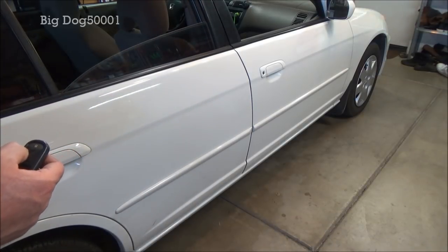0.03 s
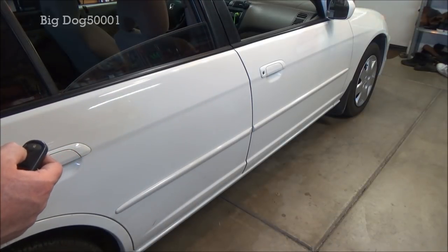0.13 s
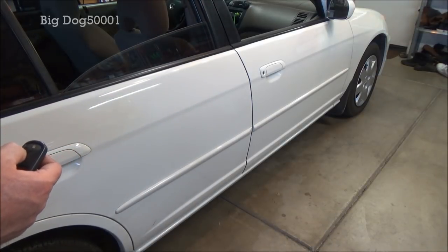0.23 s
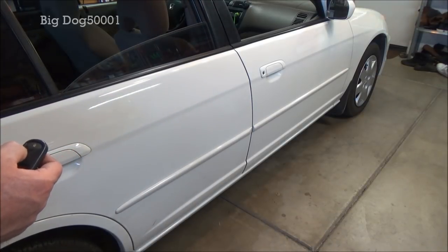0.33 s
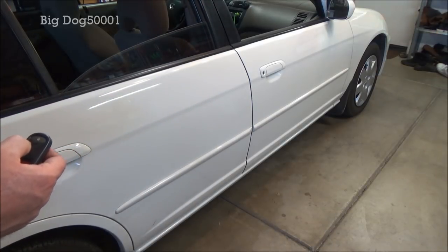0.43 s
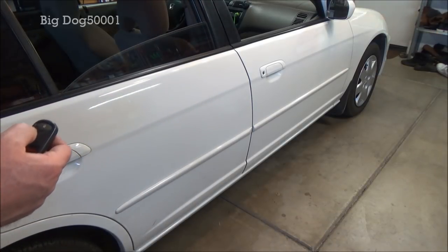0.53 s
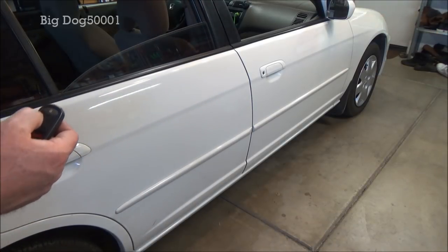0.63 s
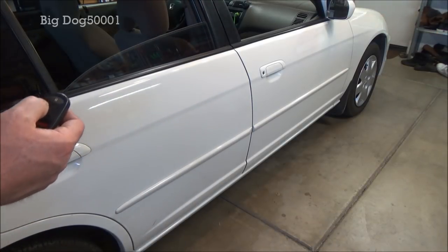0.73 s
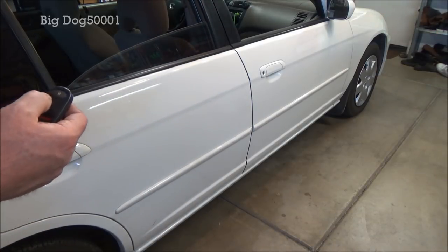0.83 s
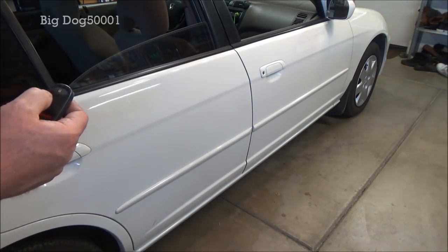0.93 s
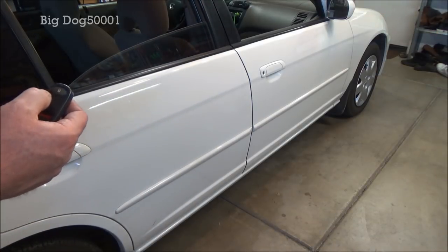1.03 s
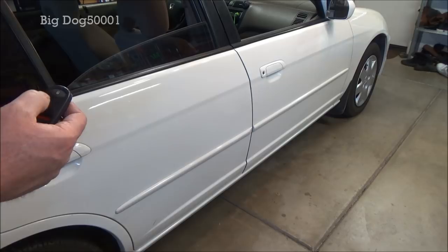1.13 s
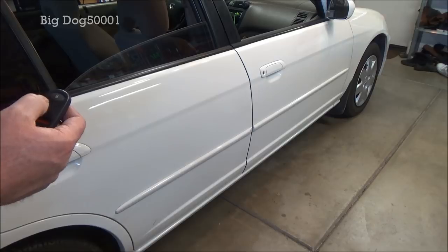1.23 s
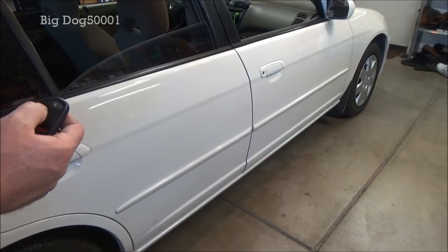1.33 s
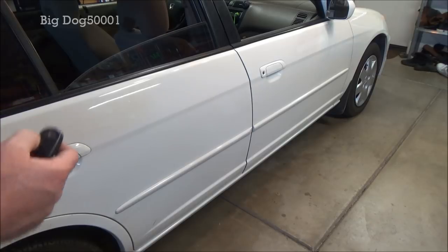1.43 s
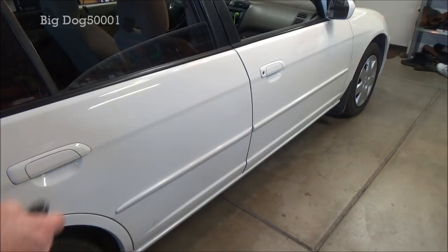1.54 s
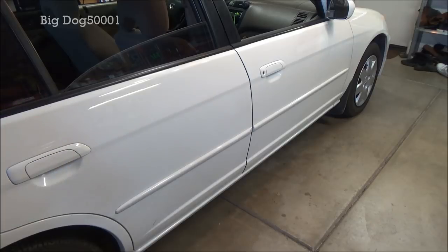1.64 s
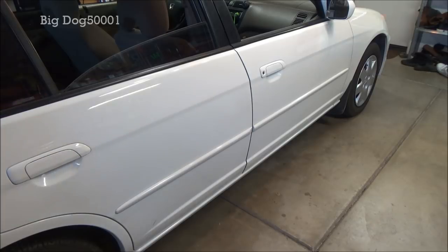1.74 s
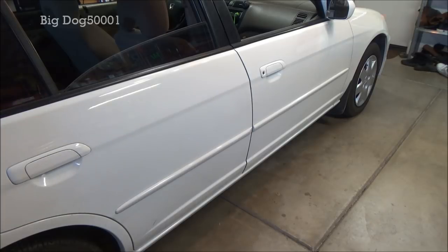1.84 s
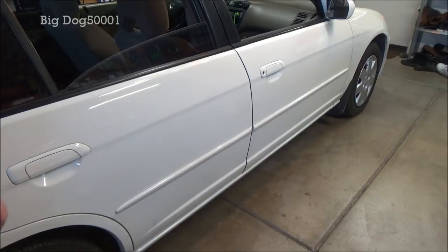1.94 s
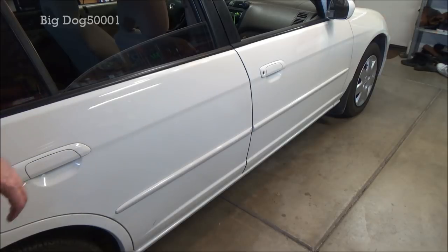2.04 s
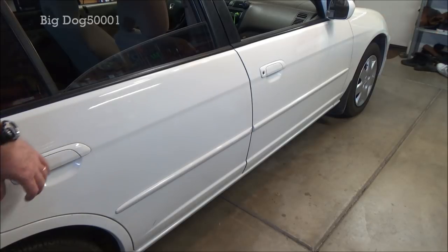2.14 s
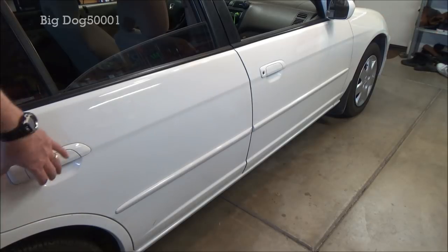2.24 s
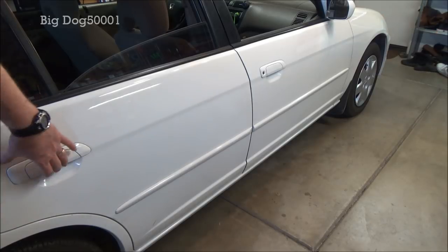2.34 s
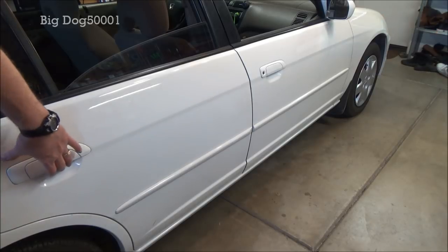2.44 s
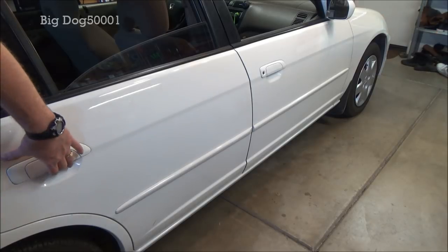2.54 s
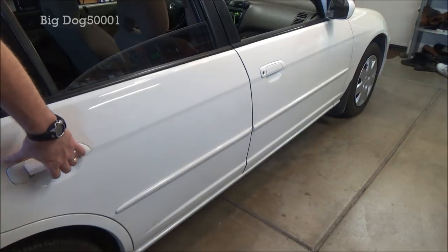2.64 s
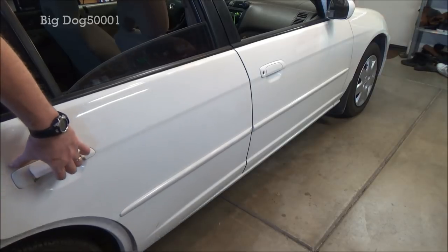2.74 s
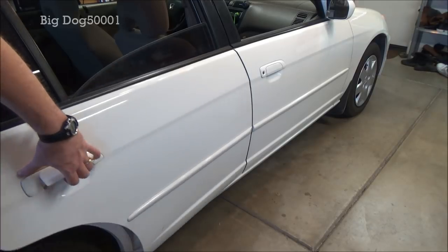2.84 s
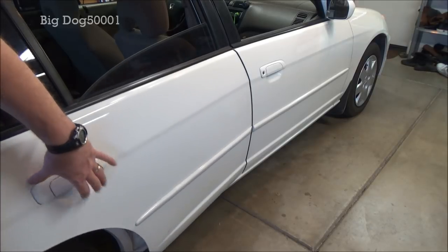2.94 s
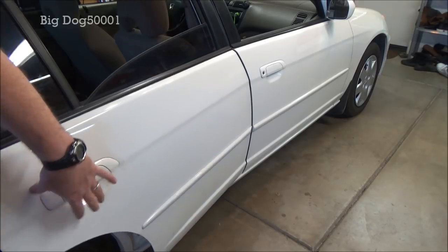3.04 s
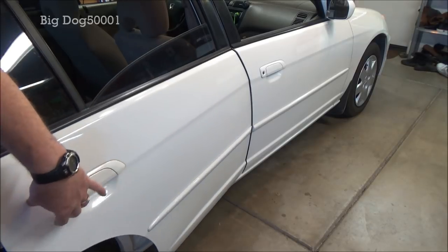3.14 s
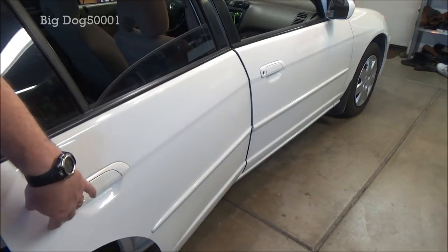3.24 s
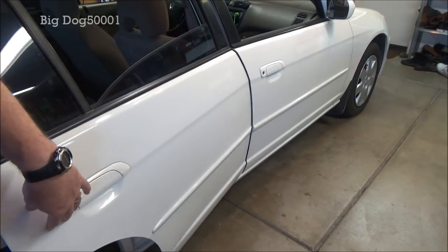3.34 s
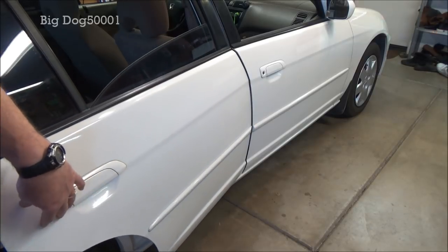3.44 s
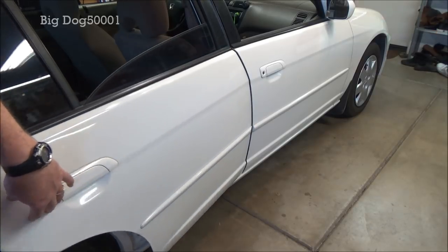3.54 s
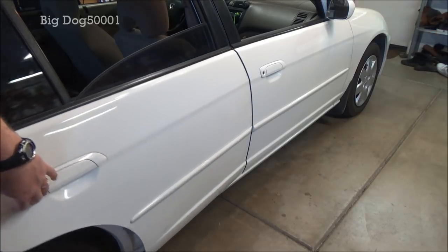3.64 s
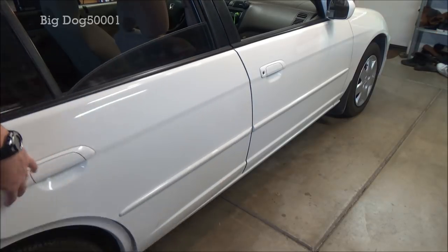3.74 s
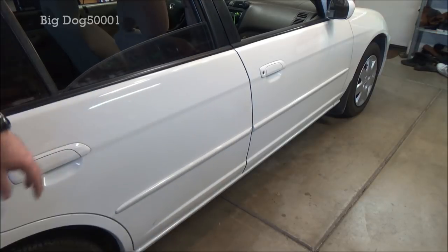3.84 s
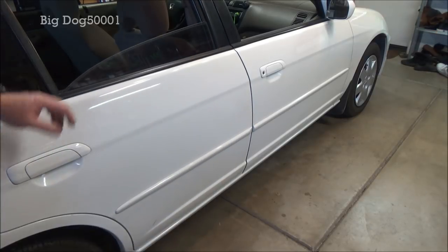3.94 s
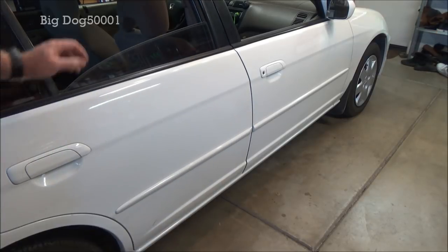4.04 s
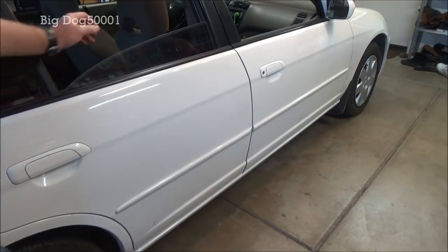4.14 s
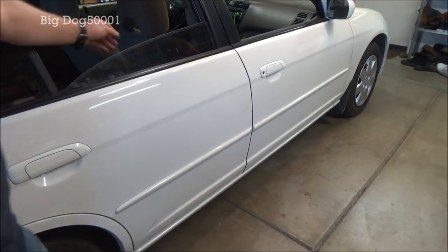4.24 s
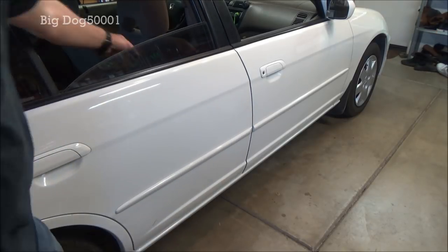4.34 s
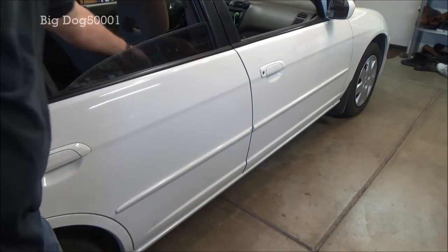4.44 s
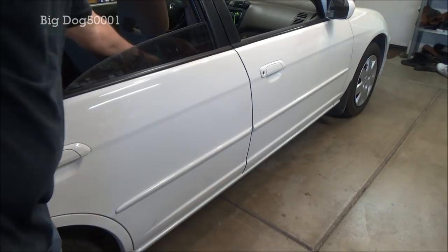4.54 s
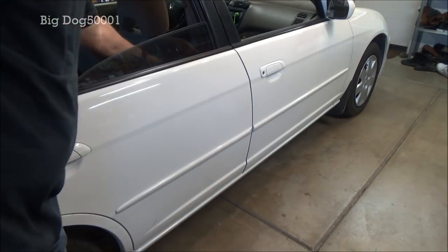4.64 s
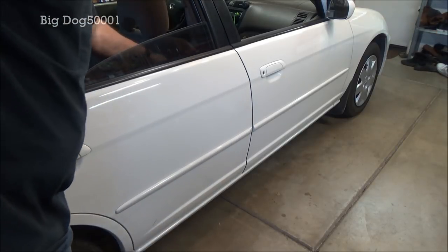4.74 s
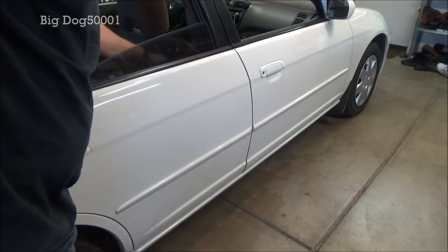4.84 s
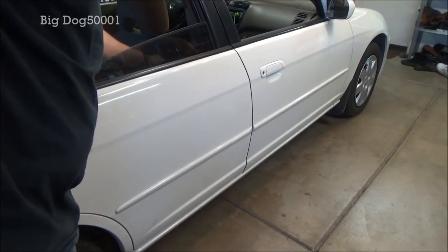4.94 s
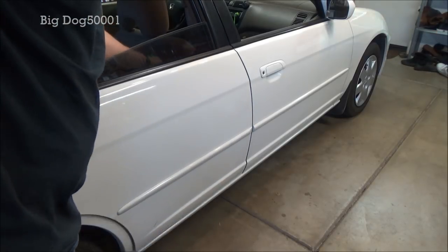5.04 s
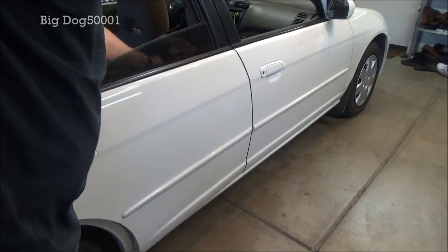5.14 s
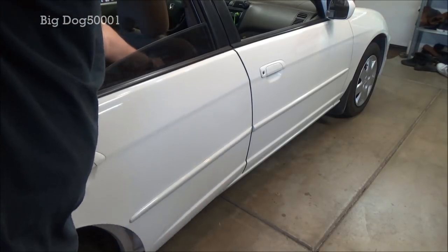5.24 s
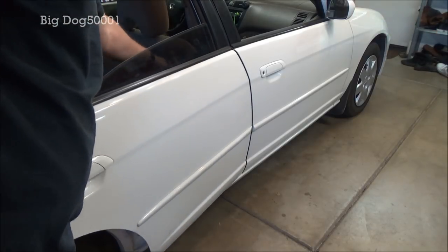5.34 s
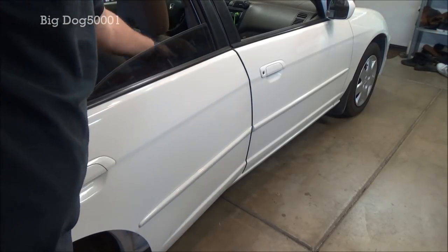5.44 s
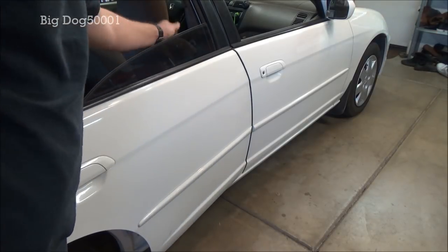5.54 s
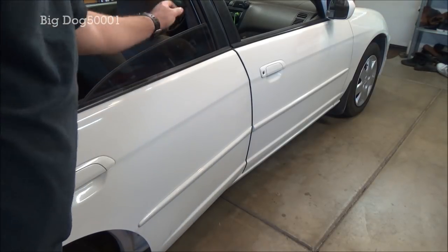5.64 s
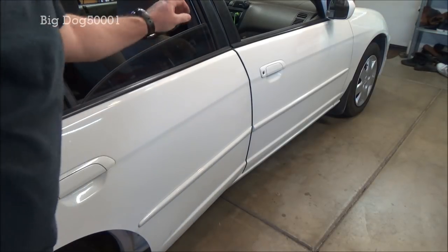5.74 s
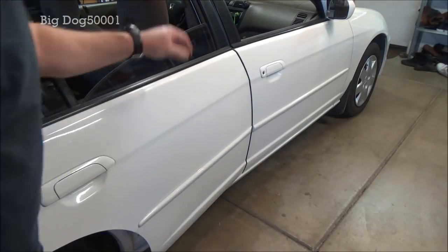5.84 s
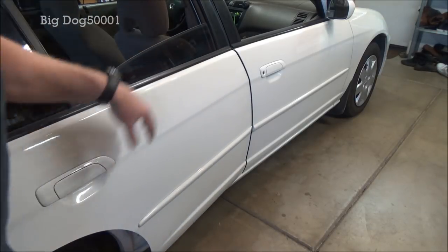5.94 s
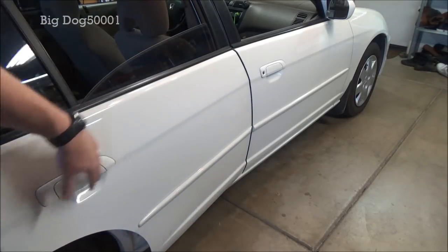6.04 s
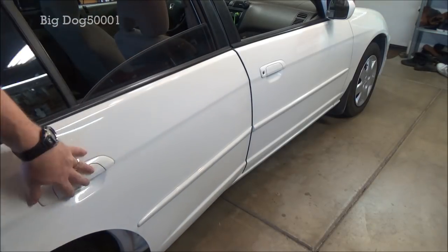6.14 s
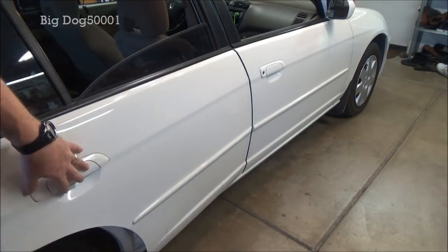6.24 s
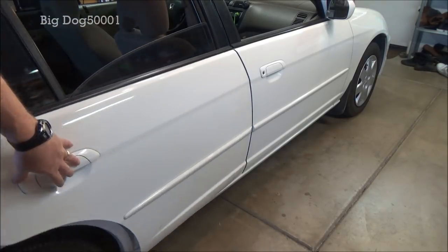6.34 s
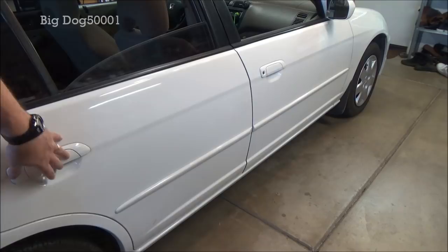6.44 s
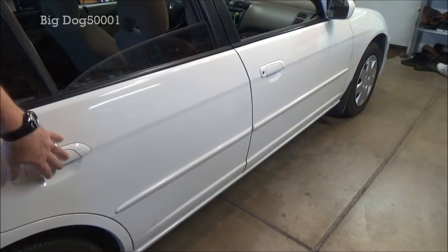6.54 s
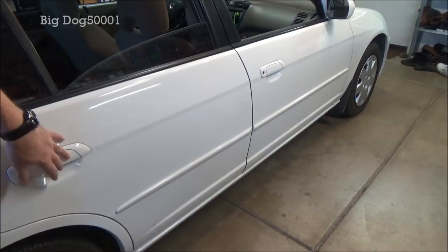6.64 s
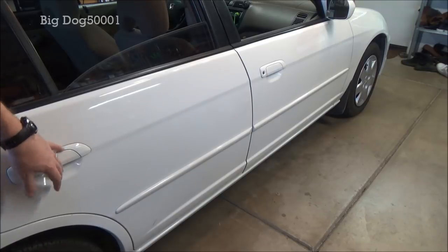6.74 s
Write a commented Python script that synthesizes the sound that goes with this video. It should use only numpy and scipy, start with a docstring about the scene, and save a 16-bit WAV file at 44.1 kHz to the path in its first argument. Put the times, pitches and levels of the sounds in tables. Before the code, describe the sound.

A quiet garage with low hiss, a swelling low murmur and very faint insect chirring at the start and around 3 s. Tiny key fob clicks snap at 0.5 and 0.8 s, with a barely audible one near 1.0. At 1.15-1.3 s the door lock clunks over in a quick, dull double knock. Soft shoe and cloth movements follow around 1.8-2.4 s. The handle clatters at 2.6-2.7 s, creaks slightly, then the latch releases at 2.94 s with a very loud hollow metallic clack. At 3.8 s the door shuts: deep thump, latch crack, small rebounds. Cloth brushes at 4.2-4.5 s; muffled knocks come from 4.5 to 5.1 s, then a clunk at 5.4 s and a bright snap at 5.5. Brushing and soft door movement rise from 5.7 to 6.35 s, before a second, slightly stronger shutting thud at 6.45 s rings out briefly.

```python
"""Key fob and car door in a garage

A hand presses a key fob, the door locks of a car clunk over, a handle is pulled and let go, the door is opened
and pushed shut twice. Blows are knocks plus dying rattles in seven registers, and they ring a resonant door shell.
Shoes shift and the door sweeps in as soft blows, a shoe squeaks as gliding tones, cloth brushes as grainy noise,
something small ticks through metal modes, a cricket chirps as gated narrow noise over soft hum and hiss.
A noise tail gives the garage."""
import sys
import numpy as np
from scipy import signal
from scipy.io import wavfile

SR = 44100
rng = np.random.default_rng(int(sys.argv[2]) if len(sys.argv) > 2 else 0)


def transcribe(signal):
    """Save signal, clipped to [-1, 1], as a 16-bit WAV file at the path in sys.argv[1]."""
    frames = np.atleast_2d(signal).T
    limited = np.clip(frames, -1, 1)
    pcm = np.round(limited * 32767).astype(np.int16)
    wavfile.write(sys.argv[1], SR, pcm)


N = 299880   # length in samples

# pushes that shut the door: (t/s, strength/dB)
SHUT_PUSHES = [(3.78, -2.8), (6.432, -2)]


def amp(db):
    """dB to gain."""
    return 10 ** (np.asarray(db, float) / 20)


def rms_one(x):
    """Scale to rms 1."""
    return x / np.sqrt(np.mean(x ** 2) + 1e-20)


def at_hz(points, hz):
    """Read a table on a log-frequency axis."""
    table_hz, values = np.array(points).T
    return np.interp(np.log(hz), np.log(table_hz), values)


def band(x, low_hz, high_hz, order=2):
    """Butterworth band-pass."""
    edges_hz = [low_hz, min(high_hz, SR / 2.2)]
    return signal.sosfilt(signal.butter(order, edges_hz, "band", fs=SR, output="sos"), x)


def sides(pan_db):
    """Left and right gains for a left-minus-right level."""
    return amp(np.array([[pan_db / 2], [-pan_db / 2]]))


def stereo(mid, side, alike):
    """Blend a common and an opposed noise so that left and right are as alike as asked."""
    return np.sqrt(1 + alike) * mid + np.sqrt(1 - alike) * side * [[1], [-1]]


def ring(x, hz, t60):
    """Damped oscillator: a unit click sets off a dying sine that starts at height 1."""
    r, w = amp(-60 / (t60 * SR)), 2 * np.pi * hz / SR
    return signal.lfilter([0, np.sin(w)], [1, -2 * r * np.cos(w), r * r], x + 1e-15)


def resonance(x, hz, width_hz):
    """Two-pole resonance with a gain of about 1 at its peak."""
    r = np.exp(-np.pi * width_hz / SR)
    zeros = np.array([1, 0, -1]) * (1 - r * r) / 2
    return signal.lfilter(zeros, [1, -2 * r * np.cos(2 * np.pi * hz / SR), r * r], x)


def clicks(rows):
    """Single sharp contacts, one sample each, from rows of (t/s, level/dB, left-right/dB)."""
    train = np.zeros((2, N))
    for s, level_db, pan_db in rows:
        train[:, round(s * SR)] = amp(level_db) * sides(pan_db)[:, 0]
    return train


def scratch(rows, t60):
    """Each contact drags on as a short dying noise."""
    envelope = signal.lfilter([1], [1, -amp(-60 / (t60 * SR))], clicks(rows) + 1e-15)
    return envelope * rng.standard_normal(N)


def hump(hz, level_db, centre_hz, slopes_db):
    """Power of a broad peak that falls off to both sides."""
    octaves = np.log2(hz / centre_hz)
    return amp(level_db - max(-slopes_db[0] * octaves, slopes_db[1] * octaves)) ** 2


def rattle(rows, rough_db, knock_db):
    """Each event is a knock and a dying run of uneven contacts, weighted by how hard it drives each register."""
    # latch, thump, boom, panel, clack, crack, snap: (low/Hz, high/Hz, lean to the left/dB,
    # share that differs between the sides, first knock/dB before knock_db, speed of rise, speed of decay)
    registers = [(544, 995, -2, 0.25, -3, 0.71, 0.94), (47.7, 85, -2.5, 0.049, -2, 0.38, 0.62),
                 (108.8, 198.7, -2.5, 0.018, 0, 1.56, 1.3), (210.4, 499, -2, 0.11, -2, 0.69, 0.83),
                 (1083, 2105, -2, 0.32, -17, 1.02, 1.076), (1950, 5360, -3, 0.2, 3, 1, 1.25),
                 (4500, 9680, -1.7, 0.05, 8, 3.2, 0.75)]
    thud_slopes_db, crack_slopes_db = (15, 11), (8, 8)   # loss below and above the centre, dB per octave
    uneven = amp(rough_db * np.minimum(rng.exponential(1, N), 4))
    clumps = rms_one(band(rng.standard_normal(N), 30.3, 280))   # contacts come in clusters a few ms apart
    # two sets of contacts, taken in turn down the list of registers
    contacts = rms_one(rng.standard_normal((2, 2, N)) * uneven * amp(1.24 * clumps))
    out = np.zeros((2, N))
    for k, (low_hz, high_hz, lean_db, apart, first_db, quick, brief) in enumerate(registers):
        hz = np.sqrt(low_hz * high_hz)
        force, knocks = np.full((2, N), 1e-9), np.zeros((2, N))
        for s, thud_db, thud_hz, crack_db, crack_hz, pan_db, t60_ms, rise_ms in rows:
            thud = hump(hz, thud_db, thud_hz, thud_slopes_db)
            crack = hump(hz, crack_db, crack_hz, crack_slopes_db)
            level_db = 10 * np.log10(thud + crack)
            at = round(s * SR)
            ms = np.arange(min(N - at, SR // 2)) * 1000 / SR
            decay = amp(level_db - 60 * brief * ms / max(t60_ms, 4))
            rise = 1 - np.exp(-quick * ms / max(rise_ms, .1))
            gains = sides(pan_db + lean_db)
            force[:, at:at + len(ms)] += gains * decay * rise
            # a slow rise softens the first knock
            knocks[:, at] = gains[:, 0] * amp(level_db + first_db + knock_db) / np.sqrt(max(rise_ms, .1))
        mid, side = contacts[k % 2]
        share = np.sqrt(SR / 2 / (high_hz - low_hz))   # keeps the band at the force's level
        drive = force * (mid + apart * side * [[1], [-1]]) + share * knocks
        out += share * band(drive, low_hz, high_hz, order=3)
    return out


def background():
    """Half-octave bands of stereo hiss with a swelling low murmur, plus hum lines of very narrow noise."""
    # hiss spectrum before overall scaling: (f/Hz, relative level/dB)
    hiss_spectrum = [(15, -37), (25, -21), (64, -2), (212, 3), (503, -4), (641, 0), (714, -3), (775, -3),
                     (988, -5), (1890, -8), (7510, -16.5), (9840, -17), (14800, -21.5), (16000, -33)]
    # hum lines: (f/Hz, rms level/dB)
    hum_lines = [(59.2, -79.5), (479.1, -86), (721.4, -79), (839.8, -82), (1007, -82)]
    # left-right likeness of the hiss: (f/Hz, likeness 0 to 1)
    likeness = [(60, 1), (240, 0.88), (950, 0.17), (3770, 0.28), (15000, 1)]
    # the low room murmur swells and sinks, less so towards the treble: (t/s, relative level/dB)
    murmur = [(0, -1.5), (1, -4.5), (2.2, -3), (3.5, 2.5), (4.5, 1), (5.3, 10.5), (5.9, 2.5), (6.8, 15.5)]
    hiss_db = -62.5   # rms
    hiss, edges = 0, 22 * 2 ** np.arange(0, 10, .5)
    white = rng.standard_normal((2, 2, N))
    swell_db = np.interp(np.arange(N) / SR, *np.transpose(murmur))
    for k, (low, high) in enumerate(zip(edges, edges[1:])):
        mid, side = band(white[k % 2], low, high)
        hz = np.sqrt(low * high)
        level_db = at_hz(hiss_spectrum, hz) + swell_db / (1 + hz / 3000)
        hiss = hiss + amp(level_db) * stereo(mid, side, at_hz(likeness, hz))
    hum = sum(amp(level_db) * rms_one(resonance(white[1, 0], hz, 16.0)) for hz, level_db in hum_lines)
    return amp(hiss_db) * rms_one(hiss) + hum


def cricket():
    """Short bursts of a narrow band at a steady rate, in bouts that fade in and out."""
    # bouts of faint chirring: (start t/s, end t/s, level/dB)
    chirring = [(0, .5, -82), (2.9, 3.8, -78.5)]
    song_hz, chirps_per_s, first_chirp_s, fade_db_per_s = 3460, 29.9, 0.0346, 90
    t = np.arange(N) / SR
    gate = np.maximum(np.cos(2 * np.pi * chirps_per_s * (t - first_chirp_s)), 0) ** 4
    bouts = 0
    for start, end, level_db in chirring:
        outside_s = np.maximum(np.maximum(start - t, t - end), 0)
        bouts = bouts + amp(level_db - fade_db_per_s * outside_s)
    return bouts * rms_one(resonance(gate * rng.standard_normal(N), song_hz, 260))


def soft_blows():
    """Footfalls, leanings and the door sweeping in before it shuts: soft blows with one place and one decay."""
    # (t/s, thud level/dB, thud f/Hz, crack level/dB, crack f/Hz, rise/ms before each register's speed)
    soft_events = [(0.018, -59.5, 60, -70, 2000, 15), (0.261, -57.5, 196, -67, 650, 5.8),
                   (0.565, -50.5, 206, -58, 700, 20), (1.782, -58, 280, -54.5, 950, 3.2),
                   (1.832, -59, 151, -61.5, 3000, 16), (2.083, -53, 237, -61, 754, 3.7),
                   (2.322, -47.5, 91, -64.5, 1370, 5.2), (2.368, -52, 128, -79, 706, 30),
                   (3.703, -49.5, 300, -49, 3000, 36), (4.244, -44, 89, -52, 900, 10),
                   (6.076, -35, 165, -49, 2650, 14.5), (6.152, -48, 130, -54, 1480, 10),
                   (6.346, -33, 380, -48.5, 3240, 36)]
    pan_db, t60_ms = 2.7, 257   # decay before each register's speed
    rows = [(*row, pan_db, t60_ms, rise_ms) for *row, rise_ms in soft_events]
    return rattle(rows, rough_db=-1.5, knock_db=7.0)


def ticks():
    """A slow regular tick: a short scratch through small damped metal modes."""
    # contacts: (t/s, level/dB, left-right/dB)
    tick_hits = [(0.393, -52, 4), (1.936, -52, 2.5), (3.4421, -50, 1.5), (4.996, -48, 2)]
    # metal modes: (f/Hz, width/Hz, level/dB)
    metal_modes = [(500, 62, 16.5), (5200, 540, 6), (6700, 640, -15), (9100, 500, -9), (9600, 500, 7),
                   (11800, 530, -26)]
    rub = scratch(tick_hits, t60=0.086)
    metal = sum(amp(level_db) * resonance(rub, hz, width) for hz, width, level_db in metal_modes)
    return metal + amp(-2.5) * band(rub, 1000, 8100)


def fob():
    """The button dome snaps inside a small plastic shell, heard as a band-passed click and three short rings."""
    # button snaps: (t/s, level/dB, left-right/dB, shell f/Hz, body level/dB, top level/dB)
    presses = [(0.5237, -46.5, -1, 3680, -23, -12), (0.827, -41.5, 3.0, 2880, -32, -6),
               (0.9727, -63.5, -7, 2870, 11, -24)]
    t60_s, body_hz, top_hz = 0.0042, 1700, 9500
    out = 0
    for s, level_db, pan_db, shell_hz, body_db, top_db in presses:
        snap = clicks([(s, level_db, pan_db)])
        out = out + ring(snap, shell_hz, t60_s) + amp(8.0) * band(snap, 920, 12000)
        out = out + amp(body_db) * ring(snap, body_hz, t60_s)
        out = out + amp(top_db) * ring(snap, top_hz, t60_s)
    return out


def all_blows():
    """Single blows and the two shuttings; the brighter the crack, the more sudden the blow."""
    # blows on lock, handle and door, each a thud and a crack: (t/s, thud level/dB, thud f/Hz,
    # crack level/dB, crack f/Hz, left-right/dB, rattle t60/ms before each register's speed)
    single_blows = [(1.144, -67, 250, -53.5, 6500, 4, 174), (1.187, -38.5, 394, -35.5, 960, 3, 445),
                    (1.216, -42, 260, -50, 1510, -1, 130), (1.255, -28.5, 304, -25.5, 1840, 2.5, 95),
                    (1.3, -31.5, 260, -40, 1100, 2.5, 120), (2.566, -50, 328, -31.5, 2040, 6.5, 69),
                    (2.587, -32.5, 202, -30, 2040, 2, 170), (2.652, -25.5, 130, -34.5, 2000, 3.5, 80),
                    (2.667, -25, 410, -33.5, 1720, 5.5, 140), (2.698, -39, 250, -38.5, 920, 1.5, 320),
                    (2.89, -39.5, 165, -39.5, 795, 2, 210), (2.939, -5, 251, -11, 1730, 6, 115),
                    (2.981, -5, 366, -12, 1100, -2.5, 49), (3.031, -47, 121, -34, 1010, -1, 200),
                    (4.468, -39.5, 180, -53, 1680, 2.5, 230), (4.609, -45.5, 176, -53.5, 1730, 2.5, 190),
                    (4.661, -56, 200, -42.5, 715, 2, 52), (4.872, -53, 248, -49, 1030, 2, 130),
                    (4.911, -46, 197, -45, 1140, 2, 310), (4.98, -25, 189, -37.5, 690, 3.5, 283),
                    (5.045, -41, 300, -36.5, 725, 4, 135), (5.098, -54, 300, -49, 1200, -2, 54),
                    (5.323, -53, 194, -40.5, 826, 2.5, 670), (5.384, -23.5, 388, -21, 1220, 2.5, 101),
                    (5.449, -36.5, 230, -51, 1100, 1, 320), (5.525, -32.5, 332, -13.5, 5530, 3.5, 116),
                    (5.599, -38.5, 194, -31.5, 1790, 2, 91)]
    # every shutting runs the same way, seal, latch, then rebounds: (delay/s, thud level/dB re strength,
    # thud f/Hz, crack level/dB re strength, crack f/Hz, left-right/dB, rattle t60/ms as above)
    shut_sequence = [(0, -12, 192, -18.5, 733, 6, 303), (.017, -23, 79, -10.5, 1790, 3.4, 163),
                     (0.052, -16, 167, -15, 1130, 1, 92), (.079, -21, 230, -20, 1100, 2, 165),
                     (0.128, -19, 215, -30, 1300, 2, 113)]
    rise_at_1_khz_ms, rise_power, fastest_rise_ms = 4.13, 0.84, 2.2   # before each register's speed
    blows = list(single_blows)
    for s, shut_db in SHUT_PUSHES:
        for late, thud_db, thud_hz, crack_db, *rest in shut_sequence:
            blows.append((s + late, thud_db + shut_db, thud_hz, crack_db + shut_db, *rest))
    rows = []
    for row in blows:
        crack_hz = row[4]
        rise_ms = max(rise_at_1_khz_ms * (1000 / crack_hz) ** rise_power, fastest_rise_ms)
        rows.append((*row, rise_ms))
    return rows


def door():
    """Blows, bounces and handle slips ring the door shell; shutting it also pumps the cabin air."""
    # the door skin bounces on its rubber seal: (t/s, level/dB)
    seal_bounces = [(3.825, -15), (3.839, -14), (3.856, -36), (6.487, -12), (6.51, -20), (6.521, -20),
                    (6.559, -20), (6.572, -28)]
    # the handle pivot creaks in small slips: (t/s, level/dB)
    handle_slips = [(2.861, -41.5), (2.875, -50), (2.889, -41), (2.912, -44), (2.928, -33.5)]
    # door shell resonances: (f/Hz, width/Hz, level/dB)
    shell_modes = [(56.5, 15, 1), (155.3, 10.8, 4), (237.2, 27, -2.5), (350, 17, -22), (500, 17, -8.5),
                   (679, 14.4, 5.5), (919, 4.2, -8), (1158, 14, 2.5), (1242, 78, -11), (1860, 160, -11),
                   (3010, 300, -1), (5340, 34, 3), (10500, 1100, -7.5)]
    low_hz, high_hz = 114, 430   # band of the bounces
    cabin_hz, cabin_t60_s, cabin_db = 22.4, 1, -31
    bounces = band(clicks([(*row, 14) for row in seal_bounces]), low_hz, high_hz)
    bounces *= SR / (2 * (high_hz - low_hz))   # makes up for what the narrow band takes from a click
    creak = band(scratch([(*row, 3.5) for row in handle_slips], t60=0.066), 600, 6900)
    blows = rattle(all_blows(), rough_db=3.5, knock_db=4.0) + creak + bounces
    shell = 0
    for k, (hz, width, level_db) in enumerate(shell_modes):
        shell = shell + (-1) ** k * amp(level_db) * resonance(blows, hz, width)   # signs alternate
    push = np.zeros(N)
    push[[round(s * SR) for s, _ in SHUT_PUSHES]] = amp(cabin_db)   # both pushes pump equally
    soft_push = signal.lfilter([.004], [1, -.996], push)
    cabin = ring(soft_push, cabin_hz, cabin_t60_s)
    return amp(-2.0) * blows + amp(3.0) * band(blows, 12400, 19200) + shell + cabin * sides(2.4)


def brush():
    """Cloth and skin brush past: grainy friction noise, brighter or darker by the stroke, over a duller drag."""
    # strokes: (peak t/s, level/dB, brightness f/Hz, drag level/dB, rise over 20 dB/s, fall over 20 dB/s)
    strokes = [(1.5, -81, 3600, -76, 0.033, 0.081), (1.846, -66, 5100, -72, 0.049, 0.12),
               (1.94, -71, 5100, -67.5, 0.049, 0.56), (2.174, -79, 4260, -90, 0.37, 0.89),
               (4.21, -58, 4360, -61.5, 0.37, 0.4), (4.468, -61, 4100, -69, 0.042, 0.33),
               (4.8, -74, 3900, -76, .5, 0.085), (5.718, -51, 4050, -59.5, 0.16, 0.33),
               (6.028, -44, 3770, -59, 0.045, 0.065), (6.262, -39, 4580, -60, 0.087, 0.084)]
    t, out = np.arange(N) / SR, np.zeros(N)
    noise = rng.standard_normal((2, N)) * amp(2.35 * np.minimum(rng.exponential(1, N), 4))
    low = rms_one(band(noise[0], 2230, 5740))
    bright = rms_one(band(noise[1], 3700, 10700, order=3))
    drag = rms_one(band(noise[1], 257, 1600))
    for s, level_db, hz, drag_db, rise_s, fall_s in strokes:
        mix = np.clip(np.log2(hz / 2600) / 1.43, 0, 1)   # 0 is all low, 1 is all bright
        stroke = amp(-20 * np.maximum((s - t) / rise_s, (t - s) / fall_s))
        friction = (1 - mix) * low + mix * bright
        out += stroke * (amp(level_db) * friction + amp(drag_db) * drag)
    return out * sides(2.3)


def squeaks():
    """A shoe squeaks: a thin tone whose pitch and level arch up and down."""
    # (start t/s, length/s, top f/Hz, fall at the ends/Hz, peak level/dB)
    shoe_squeaks = [(2.15, .12, 9900, 600, -78), (4.79, 0.047, 9600, 376, -72)]
    out = np.zeros(N)
    for s, length, top_hz, fall_hz, level_db in shoe_squeaks:
        u = np.linspace(-1, 1, round(length * SR))
        tone = np.sin(2 * np.pi * np.cumsum(top_hz - fall_hz * u ** 2) / SR)
        at = round(s * SR)
        out[at:at + len(u)] = amp(level_db) * np.sqrt(1 - u ** 2) * tone
    return out


def garage(x):
    """A dense tail of reflections that dies band by band, partly its own on each side."""
    # reverberation bands: (f/Hz, t60/s, level/dB, left-right likeness 0 to 1)
    tail_bands = [(48, .7, -7, 1), (124.5, 0.5, -6.5, 1), (313, 0.4, -6, 1), (744, 0.45, -8, 0.7),
                  (1710, 0.48, -9.5, 0.62), (3160, 0.41, -7, 0.73), (6000, 0.32, -11.5, 0.41),
                  (12800, 0.87, -20.5, 1)]
    t = np.arange(SR) / SR
    white, tail = rng.standard_normal((2, 2, SR)), 0
    for k, (hz, t60, level_db, alike) in enumerate(tail_bands):
        mid, side = band(white[k % 2], hz / 1.28, hz * 1.78) * amp(-60 * t / t60)
        # a longer tail is scaled down to hold its energy
        tail = tail + amp(level_db) * stereo(mid, side, alike) / np.sqrt(t60 * SR / 14)
    tail = tail * np.clip((t - .003) / 0.015, 0, 1)   # the first walls answer after a few ms
    return signal.fftconvolve(x, tail, axes=1)[:, :N]


def scene():
    """Near sources with the garage around them, over the background; fob and tick send a touch less to it."""
    near = soft_blows() + door() + brush()
    hand = ticks() + fob()
    return near + hand + garage(near + amp(-0.5) * hand) + cricket() + squeaks() + background()


def record(dry):
    """A compressor turns loud blows down and lets go again, peaks that slip past are rounded, the top is cut."""
    threshold_db, ratio = -15, 0.57   # ratio: dB of cut per dB over the threshold
    release_db_per_s, attack_s = 323, 0.00022
    ceiling, cutoff_hz = .55, 16600
    ramp = release_db_per_s * np.arange(N) / SR
    level_db = 20 * np.log10(np.abs(dry).max(axis=0) + 1e-9)   # louder side steers both
    held_db = np.maximum.accumulate(level_db + ramp) - ramp   # jumps up, sinks at the release rate
    over_db = np.maximum(held_db - threshold_db, 0)
    r = np.exp(-1 / (attack_s * SR))
    cut_db = signal.lfilter([1 - r], [1, -r], ratio * over_db)
    rounded = ceiling * np.tanh(dry * amp(-cut_db) / ceiling)
    return signal.sosfilt(signal.cheby2(12, 70, cutoff_hz, fs=SR, output="sos"), rounded)


dry = scene()
out = record(dry)
transcribe(out)
```